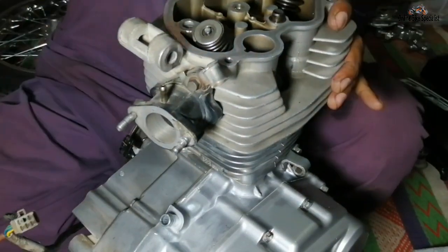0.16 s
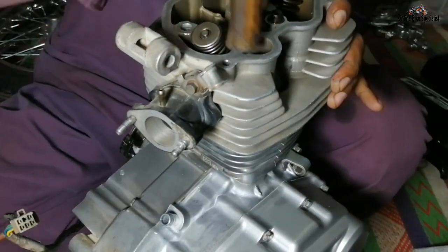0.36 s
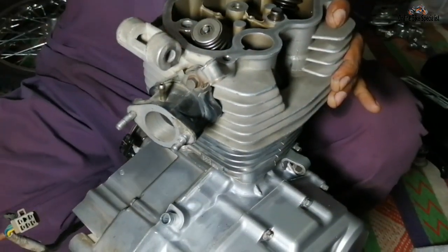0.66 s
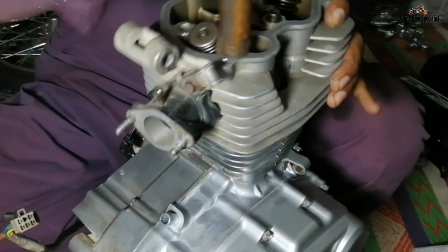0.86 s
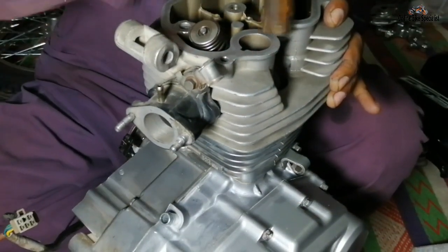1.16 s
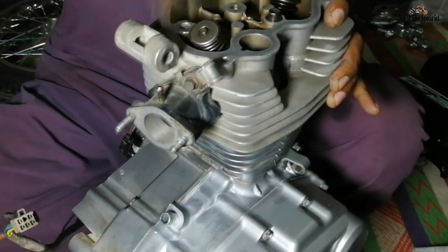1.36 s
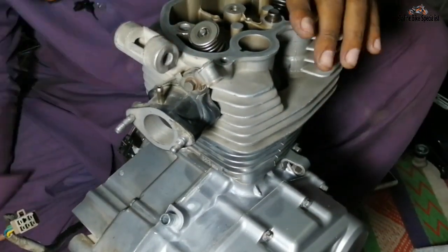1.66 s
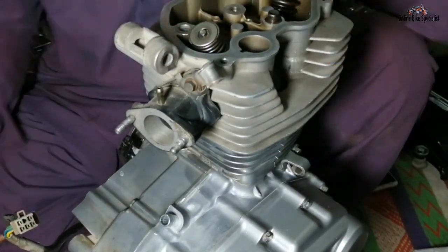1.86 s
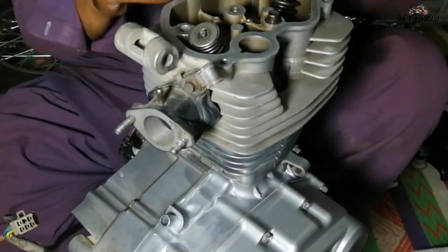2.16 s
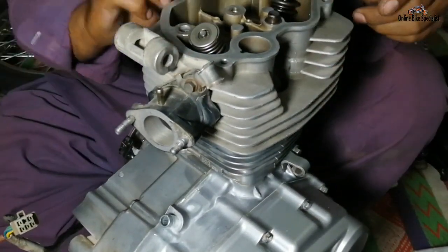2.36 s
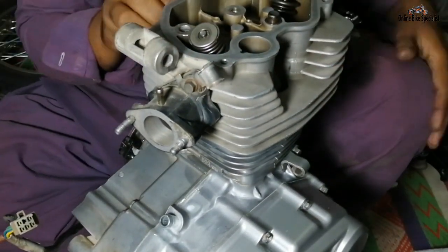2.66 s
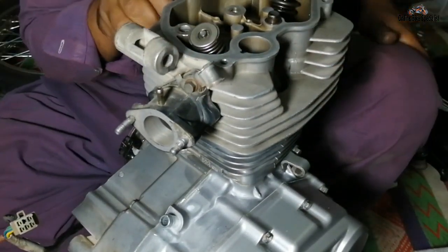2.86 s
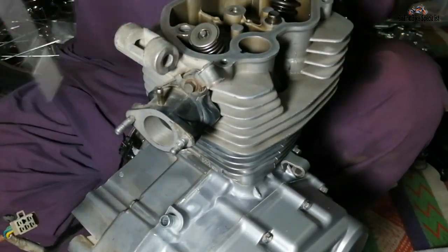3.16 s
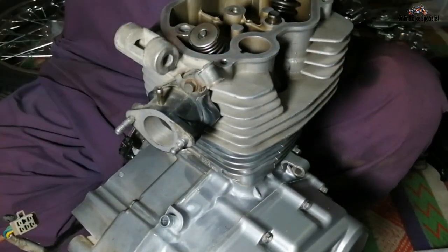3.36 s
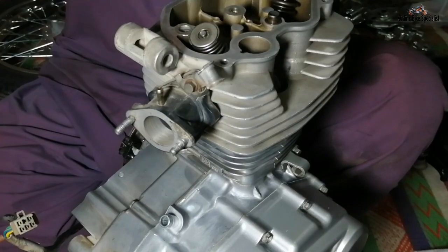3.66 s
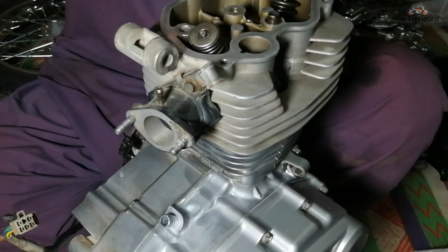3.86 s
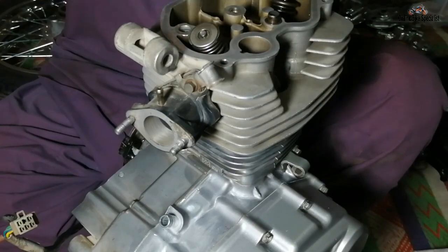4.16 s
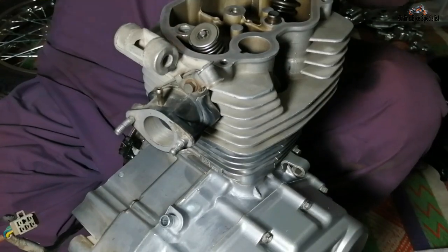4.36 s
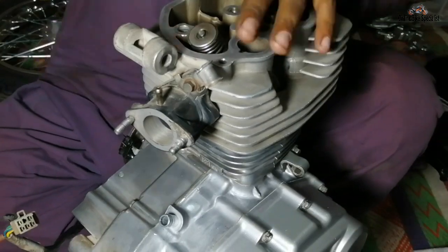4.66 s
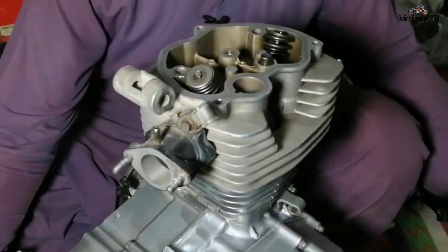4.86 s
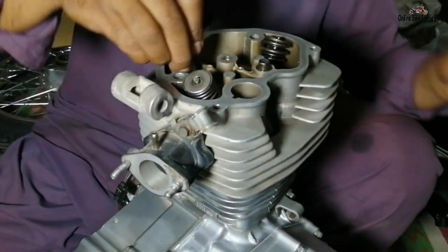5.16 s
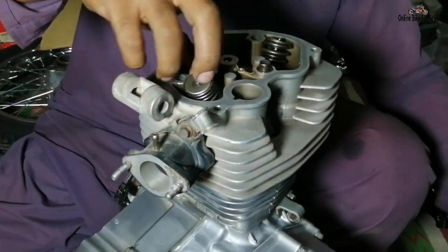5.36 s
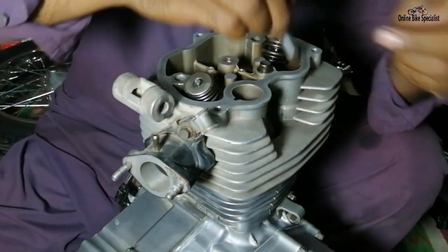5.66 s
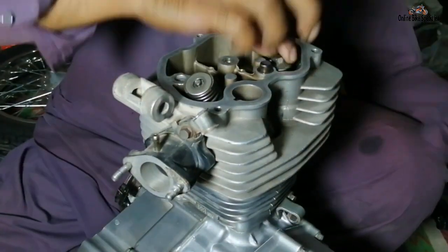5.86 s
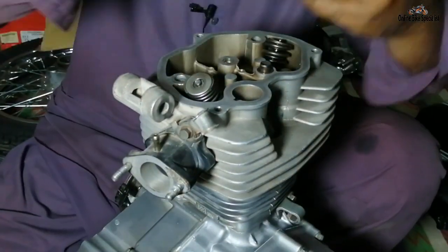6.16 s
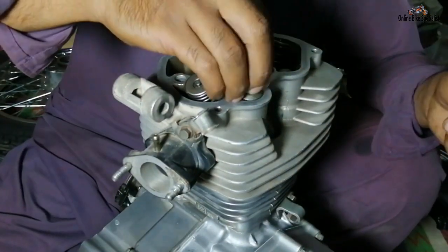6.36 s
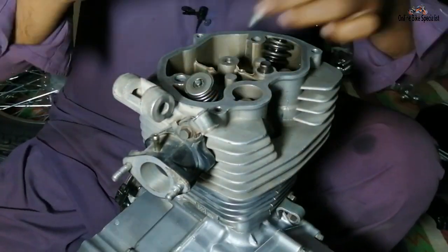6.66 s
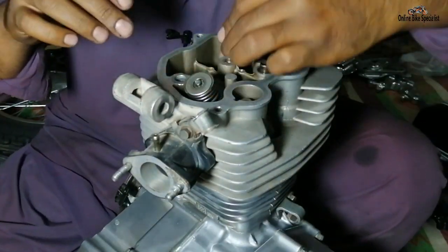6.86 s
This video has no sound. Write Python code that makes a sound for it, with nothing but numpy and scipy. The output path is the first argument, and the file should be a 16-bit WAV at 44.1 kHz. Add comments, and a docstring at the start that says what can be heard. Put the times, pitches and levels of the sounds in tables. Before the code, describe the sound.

A heavy metal casting scrapes and knocks, a motor passes with a rasping low surge, then steel parts clack and tick in near quiet.

```python
"""A casting scuffs on its seat, then takes hard dry knocks: work on a small engine at close range.
Damped modes sound the knocks and the steel parts that clink; friction noise makes the scrapes.
A rough low drone, like a motor passing outside, swells, breaks off and rumbles away: pulses drive pipe
resonances, with noise for rasp, rumble, rattle and low thumps. A dull hush of shaped noise lies under it all."""
import sys
import numpy as np
from scipy import signal
from scipy.fft import rfft, irfft, next_fast_len
from scipy.io import wavfile
from scipy.ndimage import map_coordinates

SR = 44100
rng = np.random.default_rng(int(sys.argv[2]) if len(sys.argv) > 2 else 0)


def transcribe(u):
    """Save the signal u as a 16-bit wav file named by the first command-line argument.

    u: samples, shape (n,) or (channels, n), limited to [-1, 1]; the rate is SR.
    q: integer samples, one column per channel.
    """
    v = np.clip(np.atleast_2d(u).T, -1, 1)
    q = np.round(v * 32767).astype(np.int16)
    wavfile.write(sys.argv[1], SR, q)


N = 309141  # length [samples]

# knocks on the casting: (time [s], low mode [Hz], relative level [dB],
# middle mode [Hz], relative level [dB], high mode [Hz], relative level [dB])
KNOCKS = [(0.342, 381, -13, 710, -14.5, 2700, -19.5), (0.8589, 356, -10.5, 835, -11, 4096, -17),
          (0.9616, 301, -15, 711, -10.5, 3080, -19), (1.096, 334, -9.5, 1030, -13.5, 3400, -17.5),
          (1.4412, 355, -11, 690, -15.5, 3220, -24), (3.064, 404, -23.5, 835, -23, 3400, -36.5),
          (3.095, 645, -17.5, 945, -14.5, 3230, -29.5), (3.12, 592, -21.5, 1460, -20.5, 4005, -40),
          (4.769, 293, -47.5, 1560, -20.5, 4280, -37.5), (4.8941, 797, -17.5, 1240, -10.5, 3680, -27)]
# spectrum of a low thud: (frequency [Hz], relative density [dB per Hz])
THUD_SPECTRUM = [(15, -16.5), (35, 0.5), (70, -1.5), (130, -8), (220, -24.5), (600, -70.5), (2500, -110)]
# spectrum of a rough rub in the middle range: (frequency [Hz], relative density [dB per Hz])
RASP_SPECTRUM = [(300, -43), (600, -5), (1000, 1.5), (1600, -5), (2400, -10), (3200, -27), (7000, -81.5)]
# spectrum of fine surface grit: (frequency [Hz], relative density [dB per Hz])
GRIT_SPECTRUM = [(1500, -34), (2600, 1.5), (4200, 1), (5400, -5), (8500, -11), (10500, -23.5),
                 (16000, -37.5)]
# how hard the motor labours: (time [s], load [0-1])
LOAD = [(1.6, 0.32), (1.85, 0.93), (1.88, 0.36), (2.15, .05)]
DRONE_FROM_S = 1.205


def amp(db):
    """Logarithmic level: decibels to amplitude gain."""
    return 10 ** (np.asarray(db) / 20)


def unit(x):
    """Power normalization: scale to rms 1."""
    return x / np.sqrt(np.mean(x ** 2) + 1e-20)


def along(points, hz):
    """Logarithmic pitch scale: interpolate (frequency [Hz], value) points on it."""
    f, v = np.transpose(points)
    return np.interp(np.log(hz + 1), np.log(f + 1), v)


def curves(rows):
    """Linear interpolation in time: one curve of N samples for each column after the time."""
    s, *cols = np.transpose(rows)
    return [np.interp(np.arange(N) / SR, s, c) for c in cols]


def wobble(rate, size=N):
    """Slow random modulation: a smooth curve through random knots, rate [knots per s]."""
    knots = rng.standard_normal(int(size * rate / SR) + 4)
    return map_coordinates(knots, [np.arange(size) * rate / SR])


def filtered(x, response):
    """Linear filtering: multiply the spectrum of x by a complex response of frequency."""
    n = x.shape[-1]
    m = next_fast_len(n + 8192)
    return irfft(rfft(x, m) * response(np.fft.rfftfreq(m, 1 / SR)), m)[..., :n]


def noise(spectrum, size=N):
    """Coloured noise: white noise filtered to a spectrum, at rms 1."""
    return unit(filtered(rng.standard_normal(size), lambda hz: amp(along(spectrum, hz))))


def contact(length, rise, release):
    """Onset and damping: time axis and envelope that starts fast, lasts its length and dies away [s]."""
    t = np.arange(int((length + 8 * release) * SR)) / SR
    return t, (1 - np.exp(-t / rise)) * np.exp(-np.maximum(t - length, 0) / release)


def over(x, length):
    """Energy normalization: scale x to the energy of rms 1 kept up for length [s]."""
    return x * np.sqrt(length * SR / (np.sum(x ** 2) + 1e-20))


def add(track, s, sound):
    """Superposition: mix a sound into the track at time s."""
    part = track[round(s * SR):][:len(sound)]
    part += sound[:len(part)]


def wavering(hz, width, size=N):
    """Narrow-band resonance: a sine that wanders in phase and strength at a rate set by its width."""
    phase = 2 * np.pi * hz * np.arange(size) / SR + 2.13 * wobble(width, size=size)
    return unit(np.sin(phase) * amp(2.5 * wobble(width, size=size)))


def workshop(level_db=0.5, restless_db=3.5):
    """Diffuse background: dull distant traffic whose bass comes and goes, a little wider in the treble."""
    # spectrum of the hush: (frequency [Hz], relative density [dB per Hz])
    hush_spectrum = [(12, -22.5), (22, -7), (50, -10.5), (85, -6), (180, -22.5), (360, -9.5), (600, -18),
                     (1000, -20), (2100, -34.5), (3300, -41.5), (4500, -44), (16000, -66.5)]
    # loudness of the hush before its trim: (time [s], level [dB])
    hush_level = [(4.8, -54.5), (5.6, -55.5)]
    # extra bass: (time [s], mean boost [dB])
    bass_boost = [(3.3, 3.5), (4.3, 1), (5.6, -6.5), (6.9, 2)]
    # nominal left-right correlation: (frequency [Hz], correlation [0-1])
    likeness = [(100, 1), (1000, 1), (3000, 1), (8000, 0.92), (13000, .6)]
    mid, side = (noise(hush_spectrum) * amp(1.5 * wobble(8.1)) for _ in range(2))
    bass = filtered(mid, lambda hz: 1 / (1 + (hz / 200) ** 4))
    mid = mid - bass + bass * amp(curves(bass_boost)[0] + restless_db * wobble(16))

    def turn(hz):  # mid-side mixing angle that gives the wanted correlation
        return np.arccos(np.clip(along(likeness, hz), -1, 1)) / 2

    mid = filtered(mid, lambda hz: np.cos(turn(hz)))
    side = filtered(side, lambda hz: np.sin(turn(hz)))
    return amp(curves(hush_level)[0] + level_db) * np.array([mid + side, mid - side])


def loudness_db():
    """Level contour: the motor swells steadily up to the first point, then follows the table."""
    # loudness of the motor: (time [s], level [dB])
    drone_level = [(1.48, -25), (1.708, -20.5), (1.746, -23.5), (1.856, -19.5), (1.884, -32.5),
                   (2.044, -36), (2.13, -29.5), (2.506, -45), (2.524, -40), (2.678, -51.5), (2.75, -46),
                   (2.98, -57.5)]
    swell_db_per_s = 48
    before_s = np.maximum(drone_level[0][0] - np.arange(N) / SR, 0)
    return curves(drone_level)[0] - swell_db_per_s * before_s


def motor(scatter=.25, gas_db=-4, throb=0.16, rough_db=4.0, exhaust_db=-1.0, coasting_db=3, rasp_db=-12,
          rasp_load_db=9, overtone_db=-25, overtone_load_db=14, rumble_db=-20, rumble_growth=0.55, hiss_db=-67):
    """Source and resonator: uneven firings excite the pipe; load brings out throbbing rasp and overtones."""
    # mean firing rate: (time [s], rate [firings per s])
    firing_rate = [(1.2, 66), (1.45, 58.8), (1.62, 63), (1.85, 61.5), (2.1, 60), (3, 61)]
    # exhaust pipe resonances: (centre [Hz], width [Hz], level [dB])
    pipe_modes = [(112.6, 9.4, -0.5), (234, 19, -6.5), (317.3, 120, -4), (379, 53, -3.5), (540, 33, -8),
                  (646.4, 10, -3)]
    # spectrum of rushing gas: (frequency [Hz], relative density [dB per Hz])
    gas_spectrum = [(80, -36.5), (125, 0.5), (165, -9), (230, -17), (350, 8), (480, 1.5), (680, -10),
                    (950, -32.5), (2000, -71.5)]
    # regular firings against formless rumble: (time [s], amplitude share [0-1])
    evenness = [(1.2, .8), (2, 0.93), (2.15, 0.34)]
    # spectrum of the formless rumble: (frequency [Hz], relative density [dB per Hz])
    coasting_spectrum = [(70, -21), (110, 0.5), (170, 2), (260, -2), (400, -1), (700, -17), (1500, -66)]
    # spectrum of the motor's rasp: (frequency [Hz], relative density [dB per Hz])
    motor_rasp = [(410, -37), (700, -4), (838, 5.5), (940, -4), (1060, 0), (1400, -11.5), (2060, -16),
                  (2220, -16), (2520, -18.5), (7320, -37.5), (15000, -51.5)]
    # upper resonances that ring out under load: (centre [Hz], width [Hz], relative level [dB])
    overtone_modes = [(1022, 50, 1.5), (1518, 100, -7.5), (1794, 13, -10), (2030, 47, -8.5),
                      (2350, 47, -12.5), (2900, 38, -16), (3320, 48, -16)]
    # spectrum of the low rumble: (frequency [Hz], relative density [dB per Hz])
    rumble_spectrum = [(12, -13), (28, -1.5), (45, 2), (62, 7), (85, 5), (115, -1.5), (250, -64)]
    # spectrum of the thin hiss: (frequency [Hz], relative density [dB per Hz])
    hiss_spectrum = [(2500, -43), (4100, -3), (4900, -2.5), (5600, -14.5), (9000, -12), (14000, -37)]
    hiss_from_s, hiss_hold_s, hiss_fade_db_per_s = 1.95, 0.46, 68

    t = np.arange(N) / SR
    level_db = loudness_db()
    load, = curves(LOAD)
    turns = np.cumsum(curves(firing_rate)[0] * (1 + 0.028 * wobble(18))) / SR  # counted in firings
    firings = np.diff(np.floor(turns), prepend=0) * (1 + scatter * rng.standard_normal(N))

    def pipe(f):  # parallel resonances of alternating sign
        return sum((-1) ** k * amp(db) * 1j * f * width / (centre * centre - f * f + 1j * f * width)
                   for k, (centre, width, db) in enumerate(pipe_modes))

    def muffler(f):
        return 1 / (1 + (f / 900) ** 4)

    pulses = unit(filtered(firings, lambda f: pipe(f) * muffler(f)))
    # off the throttle, the even firings give way to a formless rumble
    throttle = np.clip(curves(evenness)[0], 0, 1)
    driven = unit(pulses + amp(gas_db) * noise(gas_spectrum))
    exhaust = throttle * driven + np.sqrt(1 - throttle ** 2) * noise(coasting_spectrum)

    throbbing = 1 + throb * np.cos(2 * np.pi * turns)
    rasp = unit(noise(motor_rasp) * throbbing * amp(rough_db * wobble(110)))
    overtones = sum(amp(db) * wavering(hz, width) for hz, width, db in overtone_modes)
    drone = amp(exhaust_db + coasting_db * (1 - 2 * load)) * exhaust
    drone += amp(rasp_db + rasp_load_db * load) * rasp
    drone += amp(overtone_db + overtone_load_db * load) * overtones

    # the firing rate and its next two harmonics
    hum = sum(a * np.sin(2 * np.pi * k * turns) for k, a in ((1, 1.1), (2, 1.3), (3, .5)))
    rumble = amp(rumble_db + rumble_growth * level_db) * unit(noise(rumble_spectrum) + throttle * hum)

    fading_s = np.maximum(t - hiss_from_s - hiss_hold_s, 0)
    hiss = (t > hiss_from_s) * amp(hiss_db - hiss_fade_db_per_s * fading_s) * noise(hiss_spectrum)
    near, = curves([(DRONE_FROM_S - .05, 0), (DRONE_FROM_S + .05, 1), (2.95, 1), (3.35, 0)])
    return near * (amp(level_db) * drone + rumble + hiss)


def rattle(level_db=-13, load_db=8, clatter_db=1, scatter_db=1.5, top_hz=7000):
    """Random impacts: loose metal chatters with the drone, the more so the harder the motor labours."""
    contacts_per_s = 420
    contacts = (rng.random(N) < contacts_per_s / SR) * amp(scatter_db * rng.standard_normal(N))
    t, held = contact(0.0018, rise=.0004, release=0.0029)
    clatter = amp(clatter_db) * noise(RASP_SPECTRUM, size=len(t))
    grain = (noise(GRIT_SPECTRUM, size=len(t)) + clatter) * held
    chatter = signal.fftconvolve(contacts, grain)[:N]
    chatter = filtered(chatter, lambda hz: 1 / np.hypot(1, (hz / top_hz) ** 2))
    shaken, = curves([(DRONE_FROM_S, 0), (1.55, 1), (1.86, 1), (1.9, 0)])
    shake_db = loudness_db() + level_db + load_db * (curves(LOAD)[0] - 1)
    return shaken * amp(shake_db) * unit(chatter)


def flares(trim_db=-1):
    """Transient resonance: narrow, wavering tones catch for a moment and stop."""
    # flares: (time [s], length [s], centre [Hz], width [Hz], level before trim [dB])
    flare_events = [(0.21, 0.028, 1602, 70, -35), (1.346, 0.042, 529, 25.3, -28.5),
                    (1.45, 0.037, 540, 50, -23), (1.478, 0.14, 363, 59.9, -22),
                    (1.621, 0.097, 640, 29.7, -21.5), (1.796, 0.073, 365, 30.5, -19),
                    (1.799, 0.0592, 803.6, 49.7, -21.5), (1.576, .087, 2620, 595, -39),
                    (1.856, 0.15, 3120, 510, -54.5), (2.162, .24, 4700, 695, -58.5)]
    out = np.zeros(N)
    for s, length, hz, width, db in flare_events:
        t, held = contact(length, rise=0.0042, release=0.0008)
        add(out, s, amp(db + trim_db) * over(wavering(hz, width, size=len(t)) * held, length))
    return out


def thumps():
    """Low thumps: short soft swells of bass noise, in the drone and its fading rumble and later in the hush."""
    # thumps: (time [s], length [s], level [dB])
    thump_events = [(1.679, 0.039, -30), (2.093, 0.039, -22.5), (2.202, .05, -26.5), (2.41, 0.023, -30),
                    (2.49, 0.0648, -35), (2.605, 0.042, -37), (3.88, .05, -51), (4.164, 0.034, -47.5),
                    (4.487, .04, -51.5), (5.969, 0.051, -52)]
    out = np.zeros(N)
    for s, length, db in thump_events:
        t, swell = contact(length, rise=0.0056, release=0.0033)
        add(out, s, amp(db) * over(noise(THUD_SPECTRUM, size=len(t)) * swell, length))
    return out


def stroke(length, force_db, mix, top_hz, thud_db=0, trim_db=-0.85, grain_db=1.56):
    """Sliding friction: surface roughness makes the rub flutter until the part stops; the thud lingers."""
    # spectrum of the body of a scrape: (frequency [Hz], relative density [dB per Hz])
    body_spectrum = [(70, -43.5), (160, -13), (350, 8), (560, 2), (800, -20.5), (2000, -70)]
    usual_force_db = -40
    t, heavy = contact(length, rise=.0045, release=.011)
    held = (1 - np.exp(-t / 0.0027)) * np.exp(-np.maximum(t - length, 0) / .0038)
    grip = held * amp(grain_db * wobble(400, size=len(t)) - 3 * t / length)
    thud, *friction = [db + trim_db + growth * (force_db - usual_force_db) for db, growth in mix]
    spectra = body_spectrum, RASP_SPECTRUM, GRIT_SPECTRUM
    rub = sum(amp(db) * over(noise(spectrum, size=len(t)) * grip, length)
              for spectrum, db in zip(spectra, friction))
    rub = filtered(rub, lambda hz: 1 / np.hypot(1, (hz / top_hz) ** 2))
    return rub + amp(thud + thud_db) * over(noise(THUD_SPECTRUM, size=len(t)) * heavy, length)


def scrapes():
    """Friction between solids: heavy scuffs, light steel slides, and a settling scuff after heavy knocks."""
    # the casting scuffs on its seat: (time [s], force [dB])
    scuffs = [(.08, -39.5), (.149, -35), (.215, -34), (.25, -51.5), (.423, -46.5), (.524, -42), (.594, -36),
              (.661, -34.5), (.7, -53), (.798, -45), (1.037, -41), (1.174, -37.5), (1.243, -42),
              (1.38, -40.5), (2.368, -44), (4.37, -59), (4.495, -57), (5.97, -60.5)]
    # steel slides on steel: (time [s], force [dB])
    slides = [(2.27, -47), (2.987, -47.5), (3.02, -29.5), (3.064, -22), (3.09, -20.5), (3.124, -37.5),
              (3.295, -59), (4.766, -29), (4.835, -41), (4.87, -29.5), (4.905, -35), (4.937, -43.5),
              (5.106, -54.5), (5.243, -49), (5.861, -64.5), (6.337, -60), (6.404, -57), (6.47, -58),
              (6.858, -60), (6.921, -56)]
    # thud, body, rasp and grit of a scuff, a row each:
    # (level at the usual force before trim [dB], growth [dB per dB of force])
    scuff_mix = [(-33.5, .95), (-39, 1.05), (-40, 1.2), (-52.5, 1.2)]
    # the same rows and columns for a slide
    slide_mix = [(-51.5, .22), (-42.5, .78), (-40, 1.015), (-49, 0.93)]
    scuff_top_hz, slide_top_hz = 8000, 15000  # the casting rubs duller than bare steel
    stroke_s, run_on_s = .033, .046  # strokes closer than run_on_s run on into each other
    heavy_db = -16  # a knock with a low mode above this shifts the casting
    settle_after_s, settle_force_db, settle_thud_db = .011, -45.5, 3.5

    out = np.zeros(N)
    for strokes, mix, top_hz in (scuffs, scuff_mix, scuff_top_hz), (slides, slide_mix, slide_top_hz):
        gaps = np.diff([s for s, _ in strokes], append=np.inf)
        for (s, force_db), gap in zip(strokes, gaps):
            length = gap if gap < run_on_s else stroke_s
            add(out, s, stroke(length, force_db, mix, top_hz))
    for s, low_hz, low_db, *upper in KNOCKS:
        if low_db > heavy_db:
            settling = stroke(stroke_s, settle_force_db, scuff_mix, scuff_top_hz, thud_db=settle_thud_db)
            add(out, s + settle_after_s, settling)
    return out


def steel_tick(size):
    """Hard contact: steel on steel excites a broad treble band."""
    # spectrum of the tick: (frequency [Hz], relative density [dB per Hz])
    tick_spectrum = [(1200, -22), (2500, -10.5), (4400, 4), (8500, -1.5), (11000, -10), (16000, -18)]
    return noise(tick_spectrum, size=size)


def clinks(tap_db=-9, rough=0.41):
    """Modal ringing of steel: a tick and a dull tap, then the part's modes until the fingers damp them."""
    # modes of each steel part: (frequency [Hz], mean relative level [dB], decay time t60 [s])
    socket = [(2130, -10, .15), (3430, -30.5, 0.32), (3720, -8.5, .14), (4580, 1.5, 0.13), (5530, 3.5, .11),
              (6295, -5.5, 0.41), (7550, -6, .15), (9900, -12, .2), (10502, -5, 0.14), (11500, -18, .15),
              (14130, -22.5, .1), (15880, -23, .1)]
    collar = [(3396, -7, .15), (6282, 0, .9), (9700, -6.5, .9)]
    wrench = [(1900, 4, .1), (2150, -18, 0.12), (3461, 4, 0.078), (4420, -9.5, 0.11), (5640, 1, 0.11),
              (6513, -10.5, 0.13), (8050, -3, 0.11), (8667, -5.5, .12), (9050, -10, 0.23),
              (10440, -10, 0.072), (13800, -16.5, .08)]
    shaft = [(3680, -6.5, 0.48), (3643, 6.5, 0.081), (7120, 0, 0.059), (7299, -11.5, .15), (7900, -15, .3),
             (12710, -25, .15)]
    rocker = [(2210, -1.5, 0.051), (3700, -7.5, 0.051), (4130, -7, 0.047), (4310, -17, .05),
              (4500, -0.5, 0.047), (5550, -14, 0.052), (6250, -42, 0.2), (7300, -26, .06),
              (10200, -14, 0.039), (10550, -21, 0.039), (12000, -26, .035), (12700, -34, .04)]
    nut = [(2016, -11.5, 0.059), (3580, 5, 0.02), (4020, -7, .055), (5850, -6.5, 0.03), (6770, -1, 0.041),
           (9900, -15, .06), (10030, -9, 0.04), (10900, -14.5, 0.059), (13400, -12, 0.04),
           (14600, -21, 0.064)]
    washer = [(4150, 19.5, 0.012), (4650, 2, .05), (5790, -4.5, 0.06), (6320, -2, 0.039),
              (6780, -4.5, 0.061), (7300, -7, 0.089), (10500, -14, .05), (15200, -31, .04)]
    parts = {"socket": socket, "collar": collar, "wrench": wrench, "shaft": shaft,
             "rocker": rocker, "nut": nut, "washer": washer}
    # clinks: (time [s], ring level [dB], tick level [dB], time until the hand stills it [s], part)
    clink_events = [(2.875, -67, -63.5, .01, "nut"), (3.0642, -25, -26, 0.073, "wrench"),
                    (3.0915, -34, -22, 0.026, "wrench"), (3.121, -40, -33.5, 0.018, "wrench"),
                    (3.301, -48, -40.5, 0.037, "washer"), (3.7209, -28, -38.5, .19, "rocker"),
                    (3.757, -48, -72, 0.016, "rocker"), (4.836, -59, -58, 0.04, "collar"),
                    (4.869, -26.5, -44, 0.047, "socket"), (4.894, -24.5, -21, 0.043, "shaft"),
                    (4.936, -37.5, -57.5, .033, "collar"), (5.25, -74.5, -52.5, .025, "washer"),
                    (6.249, -51, -50.5, 0.022, "washer"), (6.406, -54.5, -63, 0.023, "washer"),
                    (6.43, -65.5, -65, 0.018, "washer"), (6.717, -70.5, -67, .01, "nut"),
                    (6.817, -67, -69, 0.0082, "nut"), (6.861, -34.5, -39.5, 0.028, "nut"),
                    (6.948, -66, -64, .008, "nut")]
    out = np.zeros(N)
    for s, ring_db, tick_db, length, part in clink_events:
        t, held = contact(length, rise=0.0009, release=0.0024)
        ring = np.zeros(len(t))
        for hz, level_db, t60 in parts[part]:
            strength = amp(level_db + rng.normal(0, 1) - 60 * t / t60)
            phase = 2 * np.pi * (hz * t + rng.random()) + rough * wobble(300, size=len(t))
            ring += strength * np.sin(phase)
        tick = steel_tick(len(t)) + amp(tap_db) * noise(RASP_SPECTRUM, size=len(t))
        add(out, s, held * (amp(ring_db) * ring + amp(tick_db - 60 * t / 0.036) * tick))
    return out


def knocks(crack_db=-7, clatter_db=-4, ring_db=-3.5, snap_db=1, rough=0.98):
    """Impact on a damped body: a hard snap, then the held casting rings in three ragged modes."""
    # spectrum of the crack: (frequency [Hz], relative density [dB per Hz])
    crack_spectrum = [(1500, -25), (2700, -4), (4300, 1), (5200, -13), (8300, -18.5), (11000, -29),
                      (16000, -33)]
    ring_s = .0085  # the held casting rings this long
    out = np.zeros(N)
    t, held = contact(ring_s, rise=0.00014, release=0.00099)
    size = len(t)
    for s, low_hz, low_db, mid_hz, mid_db, high_hz, high_db in KNOCKS:
        blow = np.zeros(size)
        # each mode falls by fall_db within the ring time
        for hz, db, fall_db in (low_hz, low_db, 9), (mid_hz, mid_db, 13), (high_hz, high_db, 24):
            phase = 2 * np.pi * hz * t + rough * wobble(hz / 3, size=size)
            mode = np.sin(phase) * held * amp(-fall_db * t / ring_s)
            blow += amp(db + ring_db) * over(mode, ring_s)
        clatter = noise(RASP_SPECTRUM, size=size) * held * amp(-12 * t / ring_s)
        crack = noise(crack_spectrum, size=size) * held * amp(-16 * t / ring_s)
        snap = noise(crack_spectrum, size=size) * held * np.exp(-t / 0.0029)
        blow += amp(mid_db + clatter_db) * over(clatter, ring_s)
        blow += amp(high_db + crack_db) * over(crack, ring_s)
        blow += amp(high_db + snap_db) * over(snap, 0.0017)
        add(out, s, blow)
    return out


def decorrelation(x, tail_db=-36, t60=0.1, treble_db=-15):
    """Decorrelation: short random treble tails make the sides differ slightly; a faint short tail follows."""
    t = np.arange(SR // 4) / SR
    tail = rng.standard_normal((2, len(t))) * amp(-60 * t / t60)
    tail = filtered(tail, lambda hz: hz / (hz + 500))
    treble = rng.standard_normal((2, len(t))) * amp(-60 * t / .008)
    treble = filtered(treble, lambda hz: hz ** 2 / (hz ** 2 + 8000 ** 2))
    tails = amp(tail_db) * tail / np.linalg.norm(tail[0])
    tails += amp(treble_db) * treble / np.linalg.norm(treble[0])
    return signal.fftconvolve(x[None], tails, axes=1)[:, :N]


def scene(lag_s=.000018):
    """Interchannel delay: all layers are summed, and the sum reaches the left side a hair later."""
    centre = knocks() + scrapes() + clinks() + thumps()
    both = centre + decorrelation(centre) + motor() + rattle() + flares() + workshop()
    sides = np.array([[-1], [1]])  # left lags, right leads, by half the delay each
    return filtered(both, lambda hz: np.exp(1j * np.pi * hz * lag_s * sides))


def record(dry):
    """Saturation and band limit: peaks are rounded off at full scale, the highest treble is removed."""
    top_hz = 16300
    rounded = dry / (1 + np.abs(dry) ** 6) ** (1 / 6)
    return filtered(rounded, lambda hz: np.clip((top_hz - hz) / 600 + .5, 0, 1))


dry = scene()
out = record(dry)
transcribe(out)
```